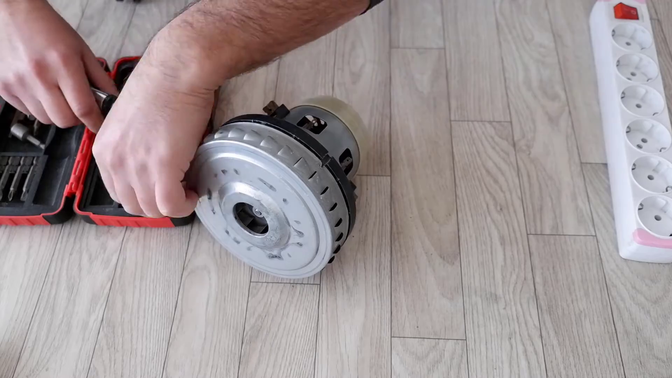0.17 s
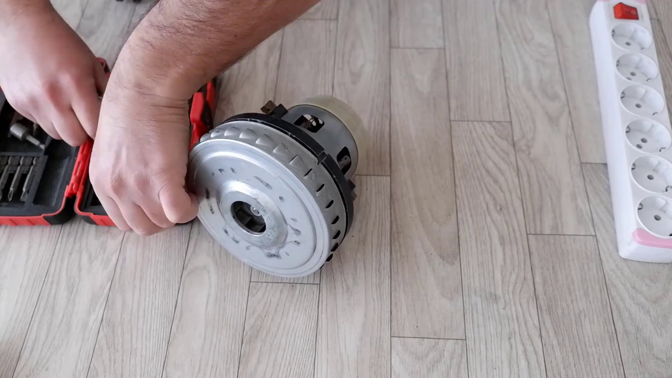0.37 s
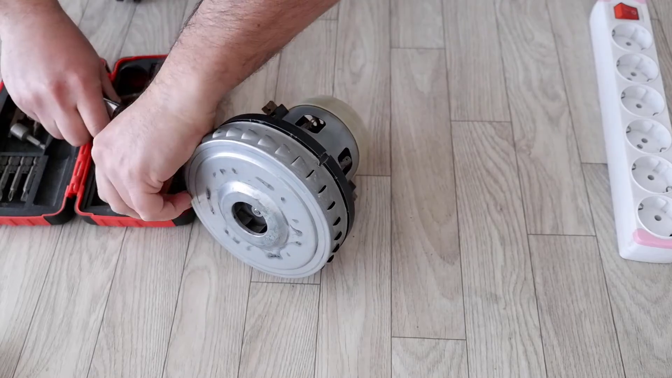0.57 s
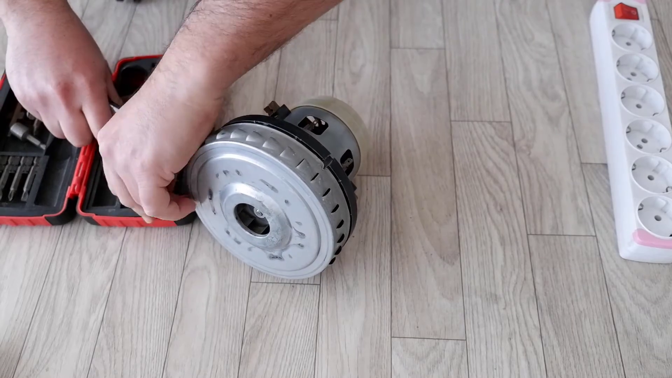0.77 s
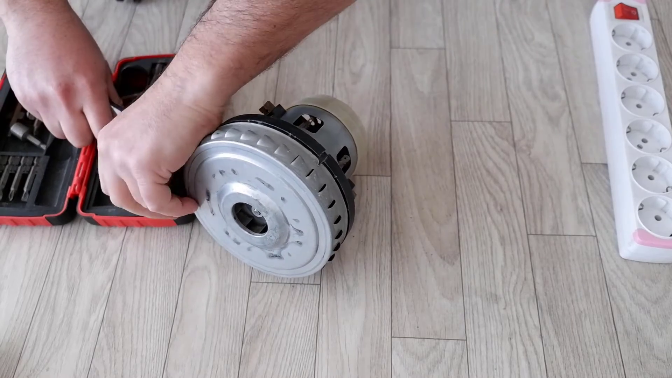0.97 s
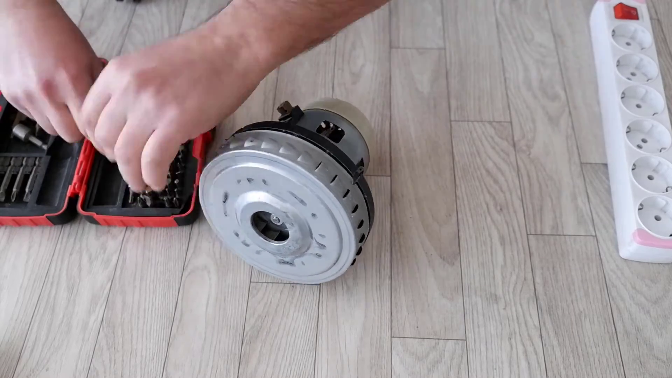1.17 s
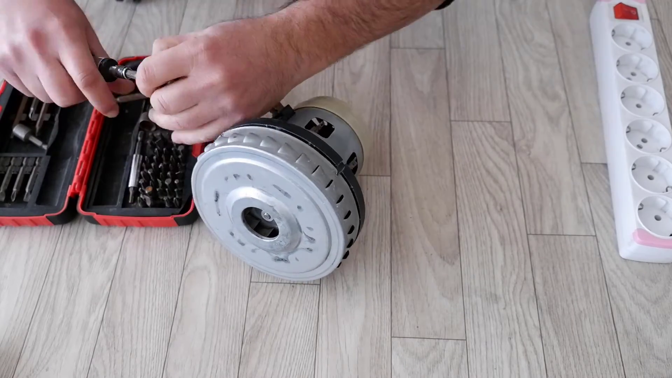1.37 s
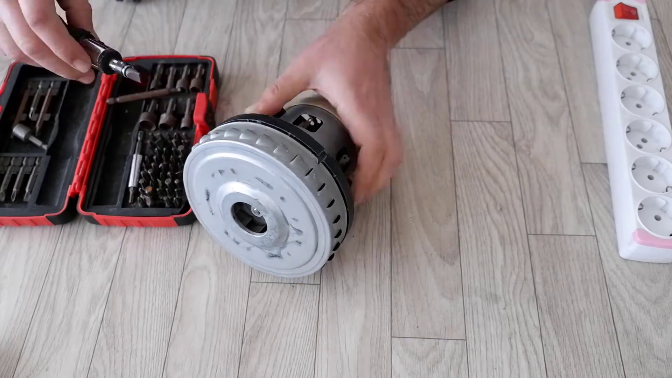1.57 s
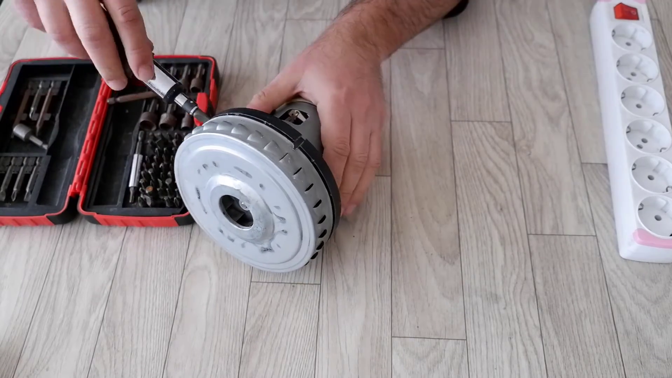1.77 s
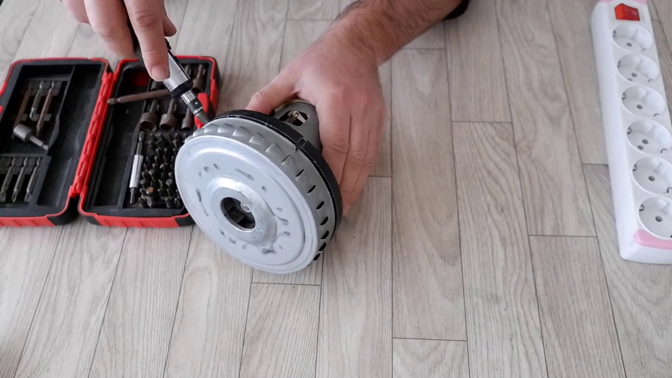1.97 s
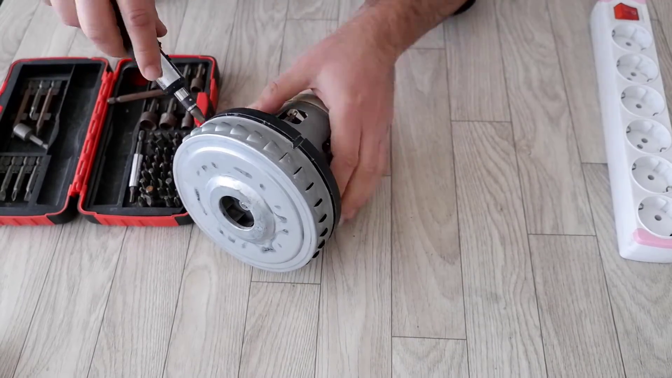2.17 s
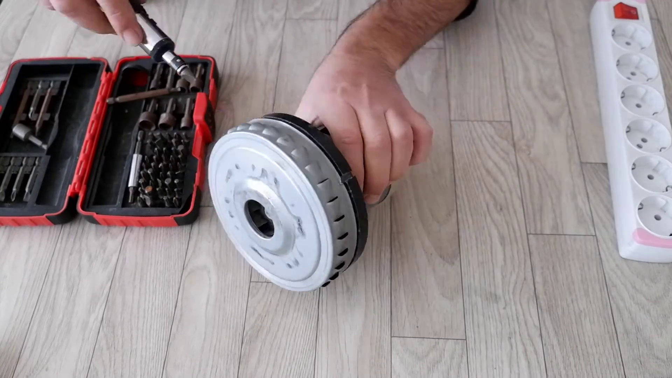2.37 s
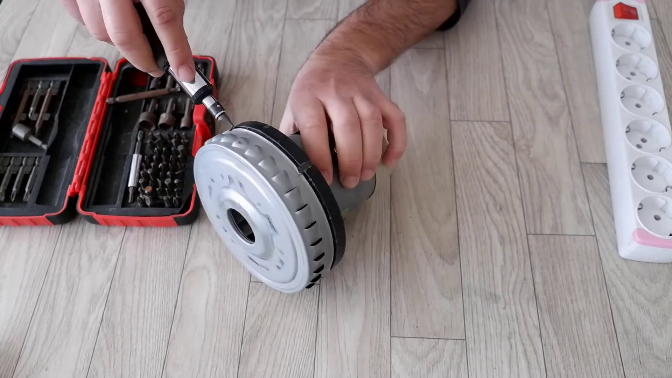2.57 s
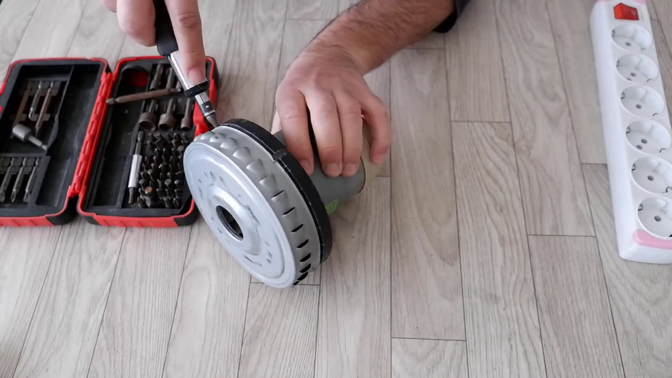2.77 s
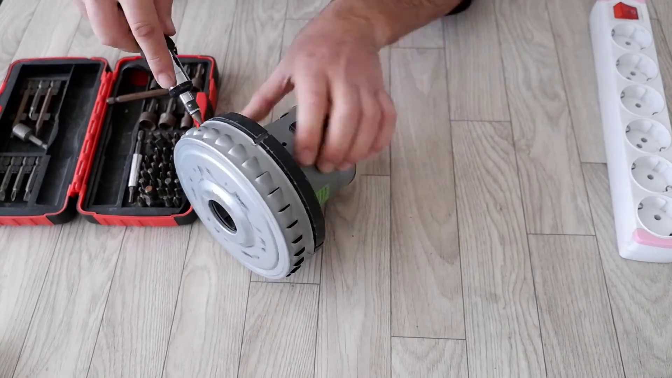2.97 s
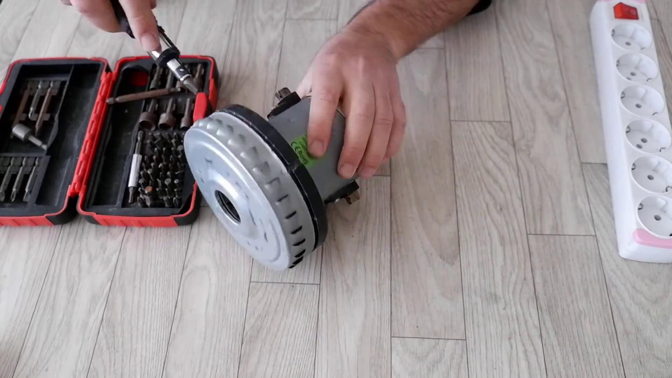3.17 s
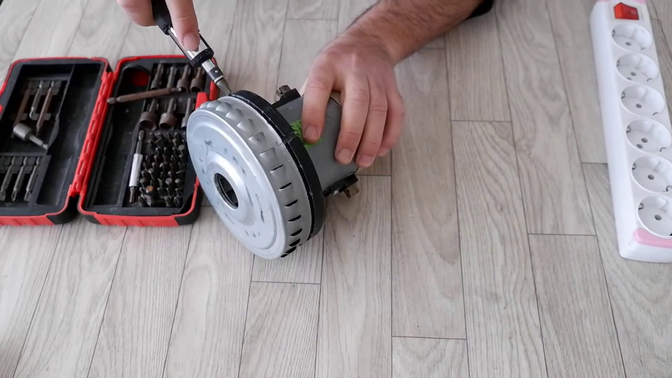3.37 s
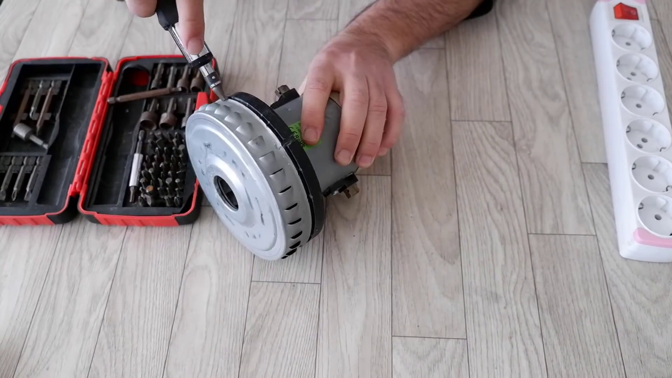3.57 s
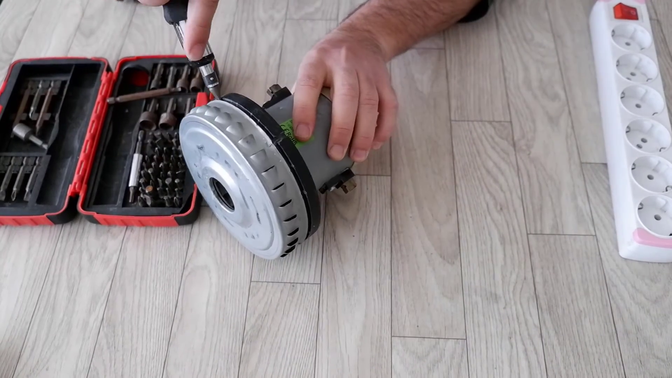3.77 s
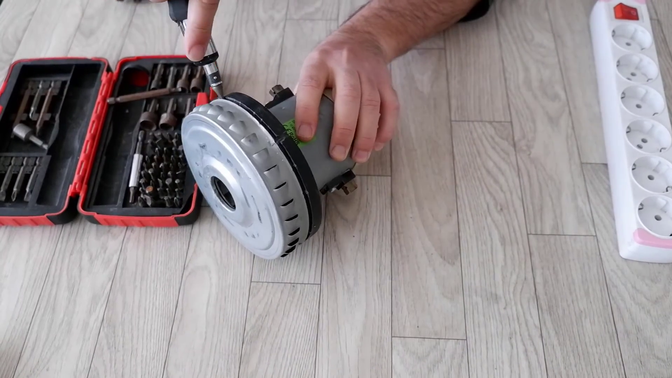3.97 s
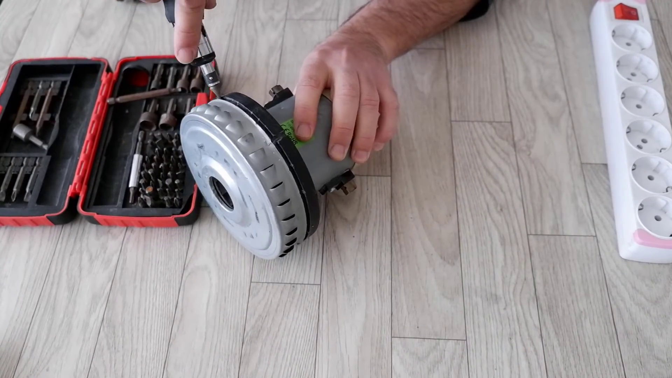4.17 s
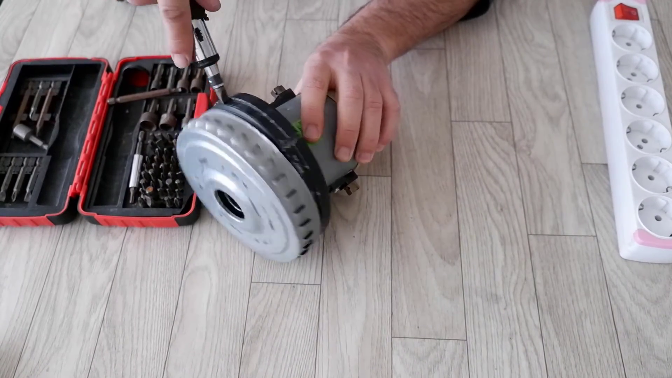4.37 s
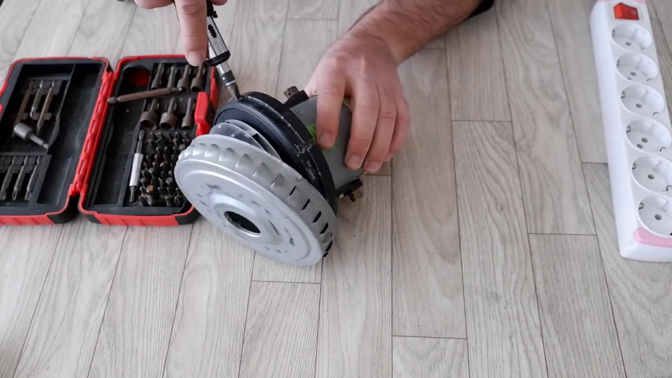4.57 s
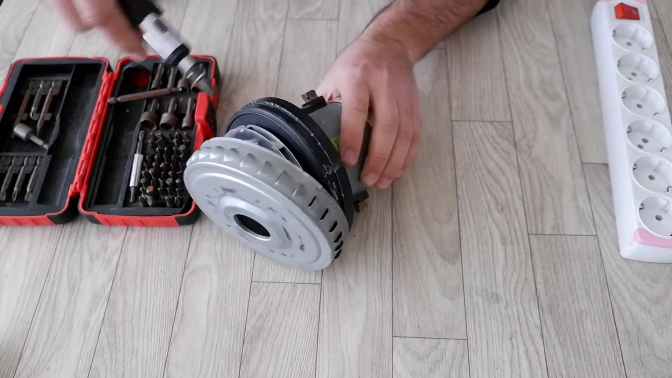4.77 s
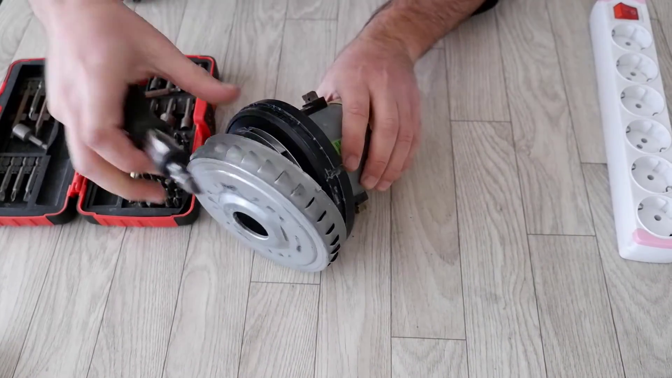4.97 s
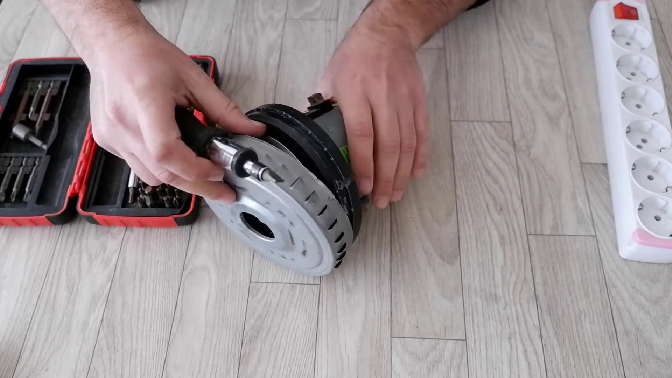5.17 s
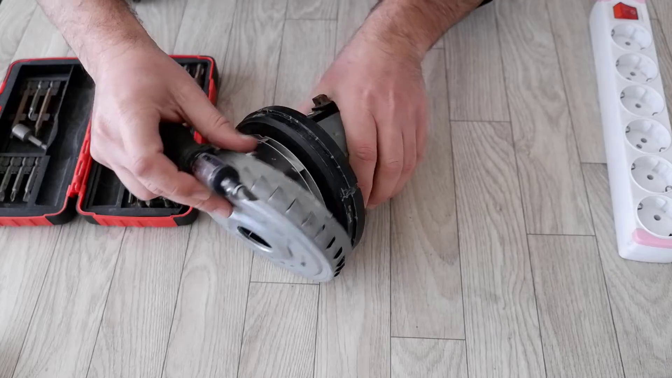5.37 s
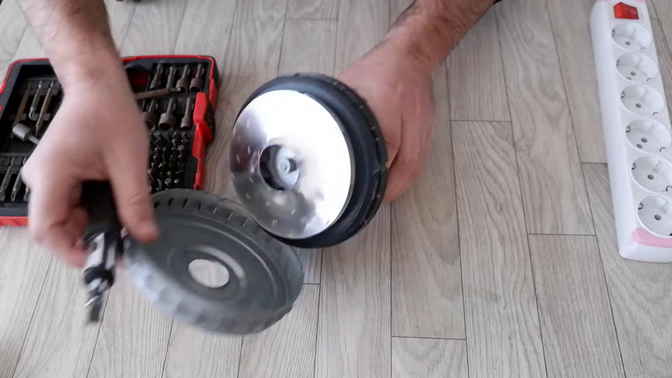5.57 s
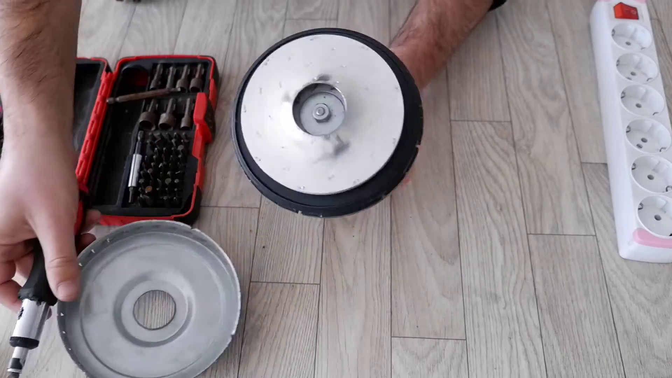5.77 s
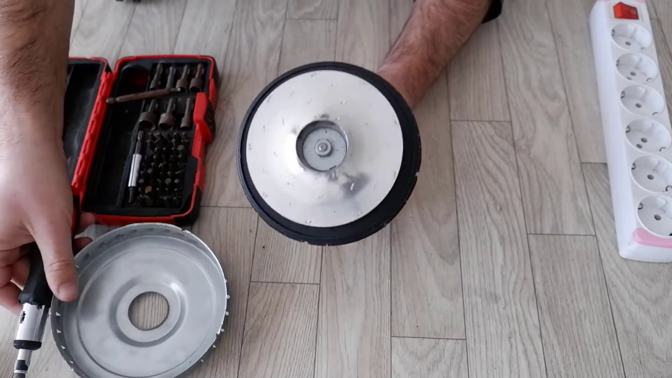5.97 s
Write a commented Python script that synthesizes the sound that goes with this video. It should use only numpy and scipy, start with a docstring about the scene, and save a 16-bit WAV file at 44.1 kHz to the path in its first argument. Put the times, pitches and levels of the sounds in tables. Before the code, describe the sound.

Close and leaning left, small tool parts click and fingers rummage softly among screwdriver bits. A blade taps and scratches along a vacuum motor's sheet-steel cover while the motor thumps on a vinyl floor. The cover comes off with a loud, ringing metallic clatter, followed by lighter taps and a sharp slap as it lands. Soft handling rustle and a faint rumble fill the small, quiet room.

```python
"""A small quiet room with a vinyl floor, a microphone pair close to the work and favouring the left.
A bit clicks out of a plastic tool case and sings as it slides in its holder on a screwdriver; a vacuum
cleaner motor thumps on the floor as it is turned over. The blade scrapes along the rim of the
sheet-steel fan cover and prises it loose: the cover grates, snaps free and rings, is lifted off and
dropped flat. Hands rustle on the parts throughout, over a faint room rumble."""
import sys
import numpy as np
from scipy import signal
from scipy.fft import rfft, irfft, next_fast_len
from scipy.io import wavfile
from scipy.ndimage import map_coordinates

SR = 44100
rng = np.random.default_rng(int(sys.argv[2]) if len(sys.argv) > 2 else 0)


def generate_wav(signal):
    """Clip the signal to [-1, 1] and save it as 16-bit WAV at the path in sys.argv[1]."""
    frames = np.transpose(np.atleast_2d(signal))
    scaled = np.clip(frames, -1, 1) * 32767
    pcm = np.round(scaled).astype(np.int16)
    wavfile.write(sys.argv[1], SR, pcm)


N = 265041

GRAB_S, LEVER_S, LOOSE_S, HELD_S, LANDING_S = 1.7, 2.55, 4.47, 4.8, 5.859
# the cover's modes on the motor: (frequency [Hz], t60 [s], side tapped [dB], rim levered [dB])
SEATED_MODES = [(371, 0.23, -20, -18.5), (550, 0.26, -34, -20.5), (703, 0.18, -34, -20),
                (840, 0.13, -17.5, -15.5), (918, 0.31, -29, -18.5), (1154, 0.075, -21, -37),
                (1230, 0.33, -35, -26), (1680, 0.38, -29, -16.5), (2008, 0.082, -35, -19),
                (2130, 0.093, -27, -36), (2290, 0.16, -15.5, -7), (2500, 0.088, -33.5, -19),
                (2833, 0.056, -7.5, -42), (3640, 0.17, -27.5, -19), (3680, 0.084, -8, -26.5),
                (3970, 0.092, -26.5, -27.5), (4770, 0.081, -22.5, -46), (4800, 0.12, -16, -38),
                (5260, 0.1, -20, -35), (7100, 0.12, -24, -51)]
# its modes once free: (frequency [Hz], t60 [s], struck [dB], rubbed [dB], landing flat [dB], held [dB])
FREE_MODES = [(276.3, 0.28, -19, -23, -30, -25), (344.3, 0.56, -43, -23, -17.5, -21),
              (678, 0.57, -45, -21.5, -2.5, -18), (988.7, 0.44, -12, -13, -12.5, -17.5),
              (1767, 0.44, -14.5, -29, -36, -11), (1980, 0.12, -32, -36, -58, -26),
              (2315, 0.18, -5.5, -20, -30, -11.5), (2573, 0.33, -23, -16, -19, -13),
              (2550, 0.22, -13, -22.5, -46, -25), (2732, 0.29, -9.5, -16.5, -28.5, -18),
              (3440, 0.42, -9, -28, -45, -14.5), (3610, 0.38, -14.5, -23, -47, -33),
              (3910, 0.4, -19, -33, -39.5, -40.5), (4200, 0.92, -30, -43.5, -48, -34),
              (4390, 0.45, -20, -28, -53, -32), (4420, 0.35, -18.5, -22, -51, -27),
              (4900, 0.92, -34.5, -44, -46, -26), (4810, 0.49, -26.5, -21.5, -45.5, -34),
              (5520, 0.26, -10, -25, -42.5, -45), (5480, 0.4, -30, -8.5, -42.5, -27),
              (6304, 0.32, -21, -45, -36.5, -46), (6430, 0.2, -30, -29, -32.5, -40),
              (7360, 0.5, -31, -49, -34, -45), (7980, 0.16, -28, -38, -31.5, -27),
              (9110, 0.23, -26.5, -58, -36, -40), (9880, 0.14, -15.5, -52, -49.5, -30),
              (10500, 0.15, -20.5, -37, -57, -49)]


def cover(struck, rubbed, side_db=9, rim_db=7, held_db=6, landing_db=-8):
    """The steel cover rings dully on its seat, freely once loose, less in the hand, low on landing."""
    blade_damping, hand_damping, floor_damping = 0.8, 0.64, 0.45  # factors on t60
    stage = np.digitize(np.arange(N) / SR, [GRAB_S, LEVER_S, LOOSE_S, HELD_S])
    tapped, levered, loose, held = stage == np.arange(1, 5)[:, None]
    touched, landing = struck + rubbed, np.zeros(N)
    add(landing, LANDING_S, amp([landing_db]) ** 2)
    hz, t60, side, rim = np.transpose(SEATED_MODES)
    sound = ring(touched * tapped, zip(hz, side + side_db, t60), waver_db=3, drift=1)
    # the blade presses on the rim, damping and unsettling its modes
    sound += ring(touched * levered, zip(hz, rim + rim_db, t60 * blade_damping), waver_db=4, drift=1)
    hz, t60, strike, rub, flat, grip = np.transpose(FREE_MODES)
    sound += ring(struck * loose, zip(hz, strike, t60))
    sound += ring(rubbed * loose, zip(hz, rub, t60))
    sound += ring(touched * held, zip(hz, grip + held_db, t60 * hand_damping))
    return sound + ring(landing, zip(hz, flat, t60 * floor_damping), waver_db=0.5, drift=0.057)


def ring(power, modes, waver_db=4.5, drift=0.26):
    """Each mode stores the power fed to it and lets it leak away, wavering in level and phase."""
    sound = np.zeros(N)
    fed = np.flatnonzero(power)
    span = slice(fed[0], fed[-1] + SR // 2)
    t = np.arange(len(power[span])) / SR
    for hz, db, t60 in modes:
        retained = amp(-120 / (t60 * SR))  # share of the energy left after one sample
        stored = signal.lfilter([1], [1, -retained], power[span] + 1e-20)
        phase = 2 * np.pi * (hz * t + rng.random()) + drift * wobble(39.4, len(t))
        gain = amp(db + waver_db * wobble(10.1, len(t)))
        sound[span] += np.sqrt(2 * stored) * gain * np.sin(phase)
    return sound


# surfaces that click and scrape: (resonance [dB], body [dB], edge [dB], feed to the cover's modes [dB])
CASE = (-1, -5, -11.5, -40)  # a bit against the plastic case
TOOL = (12.5, -6.5, 10.5, -17)  # small steel parts of the screwdriver
HOUSING = (7, 12.5, -5.5, -20.5)  # a heavy, dull body
FACE = (20, -12, -7, -12)  # the blade flat against the cover
EDGE = (19, 9, 8, -14)  # the cover's thin edge
SHEET = (8, -2, 0, -13.5)  # a broad touch on sheet steel
GRATING = (16, 2.5, 3, -5.5)  # the cover dragged off its seat
FLAT = (27, 36.5, 25.5, -13.5)  # the cover slapping the floor
# hard contacts close to the microphones: (time [s], level [dB], t60 [s], pitch [Hz], surface)
CLICKS = [(0.149, -12.5, 0.022, 1700, CASE), (0.343, -22.5, 0.033, 6190, CASE),
          (0.53, -32, 0.027, 4530, HOUSING), (0.576, -40.5, 0.091, 3040, TOOL),
          (0.927, -26.5, .04, 2810, TOOL), (1.185, -36.5, 0.074, 2060, HOUSING),
          (1.414, -25.5, 0.029, 3940, TOOL), (1.555, -18, 0.014, 2600, TOOL),
          (1.565, -27.5, 0.074, 2640, TOOL), (1.838, -27, 0.074, 4770, FACE),
          (2.535, -31.5, 0.024, 1250, HOUSING), (2.771, -29, 0.017, 1270, FACE),
          (2.874, -31, 0.037, 1190, FACE), (3.087, -32.5, 0.08, 2380, EDGE),
          (3.131, -21.5, 0.014, 1253, FACE), (3.29, -24.5, 0.0367, 2100, HOUSING),
          (3.386, -17, .022, 1915, FACE), (3.389, -21, 0.028, 2140, FACE),
          (3.599, -38.5, 0.13, 2130, HOUSING), (3.627, -24, 0.054, 2240, EDGE),
          (3.689, -27, 0.11, 2240, FACE), (4.309, -38, 0.099, 1080, HOUSING),
          (4.487, -6.5, 0.018, 2520, SHEET), (4.513, -8, 0.042, 2660, SHEET),
          (4.596, -7.5, 0.069, 2290, SHEET), (4.714, -24, 0.038, 2790, SHEET),
          (4.829, -24.5, 0.033, 1435, HOUSING), (4.865, -36, 0.17, 2440, HOUSING),
          (4.898, -31.5, 0.091, 3320, SHEET), (4.953, -21.5, 0.035, 2150, SHEET),
          (4.97, -20, 0.023, 3740, FACE), (5.059, -35, 0.074, 2070, EDGE),
          (5.114, -31.5, .078, 2520, SHEET), (5.18, -25, .031, 2595, EDGE),
          (5.204, -23, 0.048, 1710, SHEET), (5.282, -30.5, 0.031, 3100, SHEET),
          (5.859, 2, 0.0027, 2324, FLAT), (5.993, -28, 0.088, 2500, EDGE)]


def clicks(crack_db=-3, crack_s=0.00082, settle_db=-2, chatter_db=3, graze_db=-17, graze_s=0.0087):
    """Steel grazes, cracks and chatters to rest. Returns the sound and the power fed to the cover."""
    sound, power = np.zeros(N), np.zeros(N)
    t = np.arange(-SR // 50, SR // 5) / SR
    crack = np.exp(-t[t >= 0] / crack_s)
    crack /= np.linalg.norm(crack)
    for s, db, t60, hz, (*colour, ring_db) in CLICKS:
        decay = amp(-60 * np.abs(t) / t60) * (t >= 0)
        strength = amp(db) * np.linalg.norm(decay)
        settle = decay * amp(chatter_db * wobble(500, len(t)))
        if s < LOOSE_S:  # a guided tool brushes the part just before it hits
            settle += amp(graze_db) * np.exp(-np.abs(t) / graze_s) * (t < 0)
        settle /= np.linalg.norm(settle)
        add(sound, s + t[0], strength * amp(settle_db) * contact(settle, hz, *colour))
        # the first crack is over before the small modes build up
        add(sound, s, strength * amp(crack_db) * contact(crack, hz, *colour, ripple_db=2.5))
        add(power, s, amp([db + ring_db]) ** 2 * (t60 / 0.053) ** 3.87)  # longer chatter feeds more
    return sound, power


# sliding contacts, just as close: (start [s], length [s], level [dB], pitch [Hz], surface)
SCRAPES = [(0.021, 0.036, -45, 2460, TOOL), (0.121, 0.073, -27.5, 3000, CASE),
           (0.136, .041, -28.5, 1670, CASE), (0.304, 0.04, -43, 6540, CASE),
           (0.906, 0.033, -34, 1010, TOOL), (1.195, 0.072, -46.5, 2300, SHEET),
           (1.268, 0.045, -43, 2340, SHEET), (1.413, 0.025, -44, 3380, TOOL),
           (1.466, 0.064, -51.5, 4370, TOOL), (1.882, 0.039, -38.5, 1085, EDGE),
           (1.929, .11, -50.5, 4520, TOOL), (2.595, 0.028, -52.5, 1214, SHEET),
           (2.269, 0.04, -41.5, 2580, SHEET), (2.33, 0.06, -48, 1180, SHEET),
           (2.4, 0.047, -40.5, 4420, SHEET), (2.663, 0.033, -49, 1470, FACE),
           (2.721, 0.042, -45, 1200, EDGE), (2.851, 0.1, -47, 1150, EDGE), (3.111, .034, -38.5, 1143, EDGE),
           (3.214, 0.069, -40, 2290, SHEET), (3.49, 0.055, -48.5, 1670, HOUSING),
           (3.673, 0.061, -35.5, 2220, SHEET), (3.781, 0.025, -43.5, 2150, FACE),
           (3.864, 0.038, -46, 2190, FACE), (4.338, .31, -45.5, 2000, SHEET),
           (4.473, 0.052, -15, 2250, GRATING), (4.507, 0.062, -19, 2390, GRATING),
           (4.943, .05, -41.5, 4000, SHEET), (5.148, 0.1, -43, 5700, SHEET),
           (5.363, 0.13, -44, 2160, SHEET), (5.426, 0.031, -36.5, 2170, TOOL),
           (5.558, 0.078, -34.5, 2430, SHEET), (5.884, .11, -39.5, 5340, TOOL)]


def scrapes(rough_db=2.5, swell=0.57, rub_db=8):
    """Strokes swell and fade as surfaces catch and slip. Returns the sound and the cover's power feed."""
    sound, power = np.zeros(N), np.zeros(N)
    for s, length, db, hz, (*colour, ring_db) in SCRAPES:
        stroke = np.abs(np.sin(np.linspace(0, np.pi, int(length * SR)))) ** swell
        force = stroke * slips(rough_db, len(stroke))
        add(sound, s, amp(db) * contact(force, hz, *colour))
        add(power, s, amp(db + ring_db + rub_db) ** 2 * force ** 2 / np.sum(force ** 2))
    return sound, power


def slips(rough_db, size):
    """The uneven grip of sliding surfaces, as a gain of rms 1."""
    return unit(amp(rough_db * wobble(500, SR // 3)[:size]))


# colour of all contacts as heard through the microphone and recorder, with their dull, uneven treble
# above 7 kHz: (frequency [Hz], level [dB])
CONTACT_SPECTRUM = [(60, -28), (170, -16), (300, -3), (900, -1.5), (2000, -1), (4000, -6), (7000, -7.5),
                    (8300, -20.5), (10500, -21.5), (12500, -30), (15500, -17)]


def contact(force, hz, resonance_db, body_db, edge_db, ripple_db=4, ripple_hz=130, size=16384):
    """Noise under a force envelope, coloured by the parts that touch; it keeps the envelope's energy."""
    f = np.fft.rfftfreq(size, 1 / SR)
    body = along([(600, body_db), (1800, 0)], f)
    edge = along([(2500, 0.0078), (7000, edge_db)], f)
    resonance = resonance_db / (1 + (np.log2((f + 1) / hz) / 0.18) ** 2)  # half-width 0.18 octave
    # every point of contact wakes its own mix of small, short-lived modes
    ripple = map_coordinates(rng.standard_normal(size // 10), [f / ripple_hz], order=2)
    ripple *= ripple_db * np.clip(f / 450 - 1, 0, 1)  # small parts have no low modes
    db = along(CONTACT_SPECTRUM, f) + body + edge + resonance + ripple
    cepstrum = irfft(np.log(amp(db)))[:size // 2]  # a causal filter: nothing sounds before the touch
    cepstrum[1:] *= 2
    noise = rng.standard_normal(size)[:len(force)]
    sound = irfft(rfft(force * noise, size) * np.exp(rfft(cepstrum, size)))
    return sound * np.linalg.norm(force) / np.linalg.norm(sound)


# case, motor and cover bumping the vinyl floor: (time [s], level [dB], pitch [Hz])
THUMPS = [(0.146, -40, 130), (0.342, -37, 220), (0.528, -36, 275), (0.69, -31.5, 174), (1.189, -31.5, 154),
          (1.296, -36, 107), (2.534, -30.5, 122), (2.597, -23, 118), (3.099, -34, 122), (3.257, -20.5, 100),
          (3.286, -14, 122), (3.611, -35, 89), (3.69, -28.5, 326), (4.486, -17.5, 309), (4.532, -21.5, 128),
          (4.824, -17, 113), (4.85, -22, 130), (5.189, -20, 122), (5.28, -27.5, 163), (5.859, -16, 290),
          (6.004, -19, 150)]


def thumps(push_t60=0.048, settle_t60=0.11, attack_s=0.0011, rattle_db=-5, knock_db=-13, shell_hz=300):
    """A heavy part pushes the damped floor and settles with a dull rattle and a knock of its shell."""
    sound = np.zeros(N)
    t = np.arange(SR // 5) / SR
    onset, decay = 1 - np.exp(-t / attack_s), amp(-60 * t / settle_t60)
    for s, db, hz in THUMPS:
        push = -np.sin(2 * np.pi * hz * t) * amp(-60 * t / push_t60)
        rattle = amp(rattle_db) * decay * band_noise(48, hz, len(t))
        knock = amp(knock_db) * decay * band_noise(shell_hz / np.sqrt(2), shell_hz * np.sqrt(2), len(t))
        add(sound, s, amp(db) * (push + rattle + knock) * onset)
    return sound


# the bit sliding in its holder: (start [s], length [s], level [dB], right microphone against left [dB])
BIT_SLIDES = [(0.127, 0.063, -26, 6), (0.164, 0.055, -55, 6), (0.324, 0.035, -47, -9)]


def singing_bit(hz=6460, drift=0.58):
    """Friction makes the steel bit sing on one slightly rough note."""
    left, right = np.zeros(N), np.zeros(N)
    for s, length, db, right_db in BIT_SLIDES:
        t = np.arange(int(length * SR)) / SR
        phase = 2 * np.pi * hz * t + drift * wobble(300, len(t))
        note = amp(db) * np.hanning(len(t)) * unit(np.sin(phase))
        add(left, s, note)
        add(right, s, amp(right_db) * note)
    return np.array([left, right])


def fumbling(start_s=0.34, end_s=1, per_s=18, touch_s=0.078, level_db=-55, usual_hz=2840):
    """Fingers rummage among the bits in the case, each touch with its own strength and pitch."""
    sound = np.zeros(N)
    stroke = np.hanning(int(touch_s * SR))
    for k, (shift, softness, pitch) in enumerate(rng.standard_normal((40, 3))):
        s = start_s + (k + shift / 2) / per_s
        if s < end_s:
            force = stroke * slips(rough_db=4, size=len(stroke))
            hz = usual_hz * np.exp(0.19 * pitch)
            brush = contact(force, hz, resonance_db=5, body_db=6, edge_db=0, size=4096)
            add(sound, s, amp(level_db - 0.5 * softness) * brush)
    return sound


# the bed between contacts: (time [s], rumble level [dB], rustle level [dB])
BED_LEVELS = [(0.0, -66.5, -74.5), (0.4, -59.5, -65.5), (0.77, -66, -73.5), (2.01, -66, -70.5),
              (2.28, -62, -73), (2.53, -62, -70), (2.84, -64.5, -68.5), (3.33, -59.5, -73),
              (4.05, -66, -70), (4.32, -55, -67.5), (4.67, -53.5, -57), (4.95, -54, -61), (5.31, -53, -65),
              (5.62, -64, -65), (5.89, -57.5, -68.5), (6.01, -56, -64.5)]
# room tone: (frequency [Hz], spectral density [dB])
RUMBLE_SPECTRUM = [(12, -26), (20, 2), (400, -12.5), (520, -43.5), (880, -120)]
# hands on the parts, near the microphones: (frequency [Hz], spectral density [dB])
RUSTLE_SPECTRUM = [(120, -18), (200, 0), (387, -3), (763, -3), (899, -2), (1560, -7.5), (1680, -11.5),
                   (2380, -4.5), (3070, -12), (6520, -12), (8580, -22.5), (15100, -17.5), (16000, -21.5)]


def rumble_and_rustle(contacts, rumble_db=7, rustle_db=10, linger_s=0.049, linger_db=-29.5, right_db=-4):
    """The room rumbles; hands rustle softly on the parts and keep rubbing just after each contact."""
    times, rumble_levels, rustle_levels = np.transpose(BED_LEVELS)
    t = np.arange(N) / SR
    rumble = amp(np.interp(t, times, rumble_levels) + rumble_db)
    rumble = rumble * fluttering_noise(RUMBLE_SPECTRUM, per_s=27)
    leak = 1 / (linger_s * SR)
    lingering = amp(linger_db) * np.sqrt(signal.lfilter([leak], [1, leak - 1], contacts ** 2))
    handling = amp(np.interp(t, times, rustle_levels) + rustle_db)
    rustle = np.hypot(handling, lingering) * fluttering_noise(RUSTLE_SPECTRUM, per_s=60)
    return (rumble + rustle) * amp([[0], [right_db]])


# the small room's decay: (frequency [Hz], t60 [s])
ROOM_DECAY = [(150, 0.56), (2000, 0.58), (10000, 0.024)]


def reflections(work, near_db=-15, room_db=-26):
    """Floor and case scatter the sound briefly from close by; the walls add a longer tail."""
    near = echo(work, [(200, 0.059), (8000, 0.004)])
    return amp(near_db) * near + amp(room_db) * echo(work, ROOM_DECAY)


def echo(x, decay):
    """A diffuse tail, its own at each microphone; decay lists (frequency [Hz], t60 [s])."""
    hz, t, noise = signal.stft(rng.standard_normal((2, SR // 2)), SR, nperseg=256)
    tail = signal.istft(noise * amp(-60 * t / along(decay, hz)[:, None]), SR, nperseg=256)[1]
    delayed = np.pad(x, (SR // 600, 0))
    return signal.fftconvolve(delayed[None], tail / np.linalg.norm(tail[0]), axes=1)[:, :N]


def fluttering_noise(spectrum, per_s, flutter_db=3):
    """Stereo noise of the given spectrum whose level flutters at random."""
    flutter = amp(flutter_db * wobble(per_s, N))
    return flutter * unit(filtered(rng.standard_normal((2, N)), lambda hz: amp(along(spectrum, hz))))


def band_noise(low_hz, high_hz, size):
    """Band-passed noise of rms 1."""
    band = signal.butter(2, [low_hz, high_hz], "bandpass", fs=SR, output="sos")
    return unit(signal.sosfilt(band, rng.standard_normal(size)))


def amp(db):
    """Decibels to gain."""
    return 10 ** (np.asarray(db) / 20)


def unit(x):
    """x scaled to rms 1."""
    return x / np.sqrt(np.mean(x ** 2) + 1e-20)


def along(points, hz):
    """Interpolate (frequency [Hz], value) points on a log axis."""
    f, values = np.transpose(points)
    return np.interp(np.log(hz + 1), np.log(f), values)


def wobble(per_s, size):
    """A random curve with per_s knots a second."""
    at = np.arange(size) * per_s / SR
    knots = rng.standard_normal(int(at[-1]) + 2)
    return np.interp(at, np.arange(len(knots)), knots)


def filtered(x, response):
    """x through a frequency response."""
    size = next_fast_len(N + SR // 2)
    return irfft(rfft(x, size) * response(np.fft.rfftfreq(size, 1 / SR)), size)[..., :N]


def add(track, s, x):
    """Mix x into the track from time s."""
    i = min(max(round(s * SR), 0), N)
    track[i:i + len(x)] += x[:N - i]


# direct sound at the shaded right microphone: (frequency [Hz], gain [dB])
RIGHT_SHADE = [(100, -18), (700, -14), (2400, -12), (5000, -29.5), (12000, -15.5)]
# the balance shifts with the place of the work: (time [s], right microphone gain [dB])
RIGHT_BALANCE = [(.16, 6), (.3, -10.5), (1.5, 0), (3.298, -5), (4.5, -1), (5.6, -1.5), (5.85, -6.5)]


def scene(right_lag_s=0.000461):
    """The close pair hears the work first and loudest on the left, with the room around it."""
    taps, struck = clicks()
    strokes, rubbed = scrapes()
    work = taps + strokes + thumps() + cover(struck, rubbed) + fumbling()
    shaded = filtered(work, lambda hz: amp(along(RIGHT_SHADE, hz))
                      * np.exp(-2j * np.pi * hz * right_lag_s))
    left, right = np.array([work, shaded]) + reflections(work)
    balance = amp(np.interp(np.arange(N) / SR, *np.transpose(RIGHT_BALANCE)))
    return np.array([left, right * balance]) + singing_bit() + rumble_and_rustle(taps + strokes)


def record(dry):
    """The loudest peaks clip at full scale; nothing is kept above 16 kHz."""
    return filtered(np.clip(dry, -1, 1), lambda hz: hz < 16000)


dry = scene()
out = record(dry)
generate_wav(out)
```